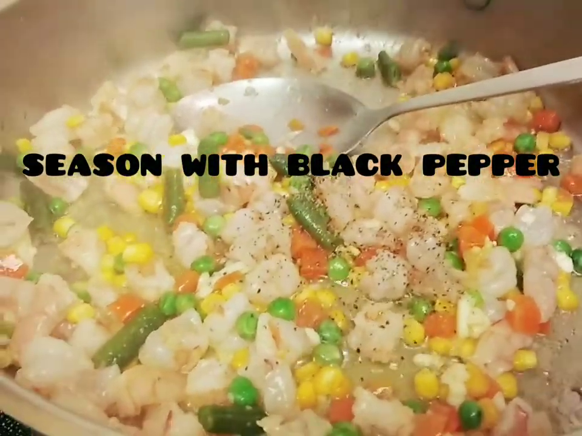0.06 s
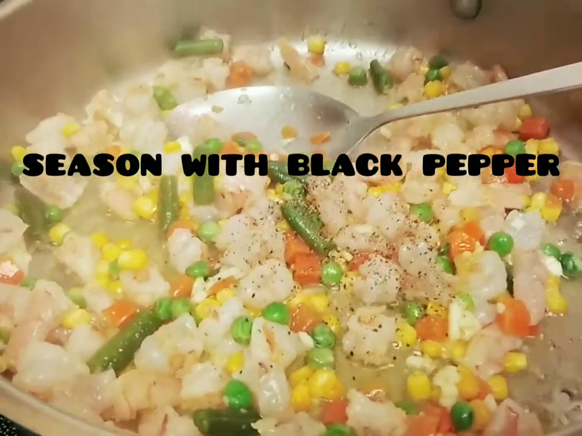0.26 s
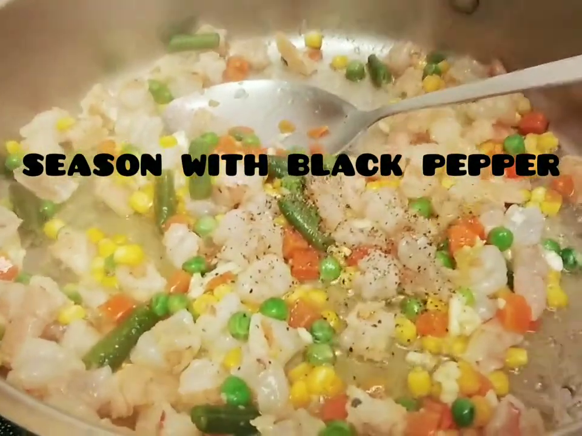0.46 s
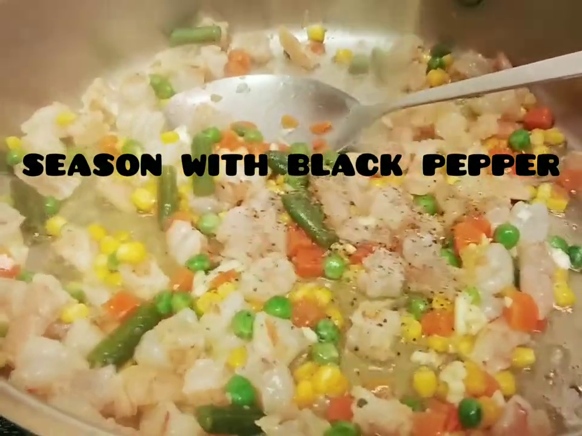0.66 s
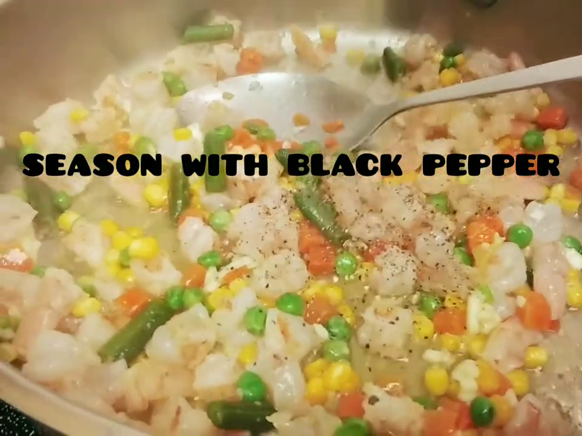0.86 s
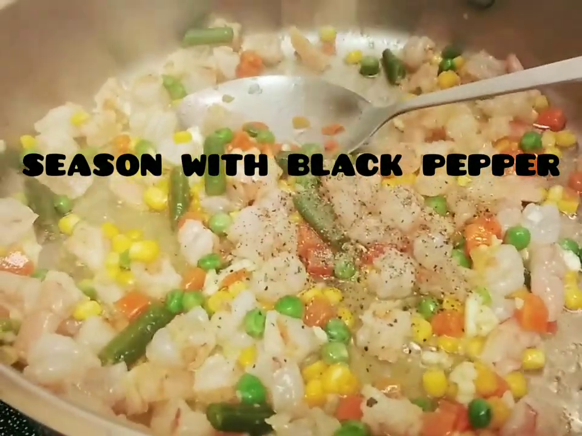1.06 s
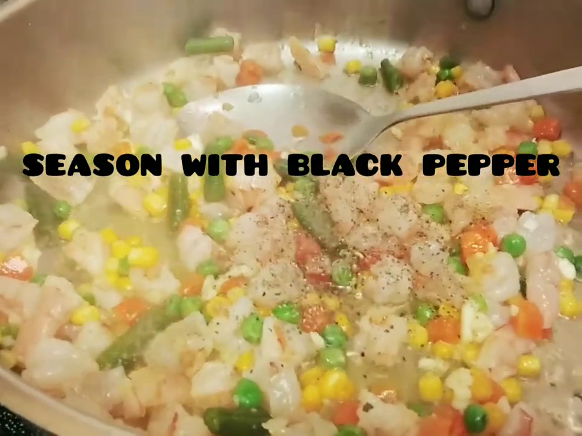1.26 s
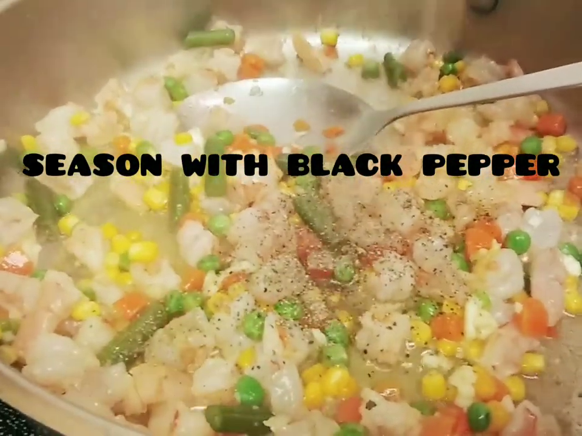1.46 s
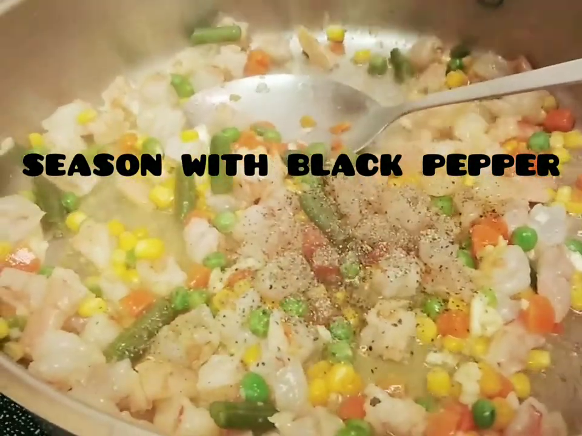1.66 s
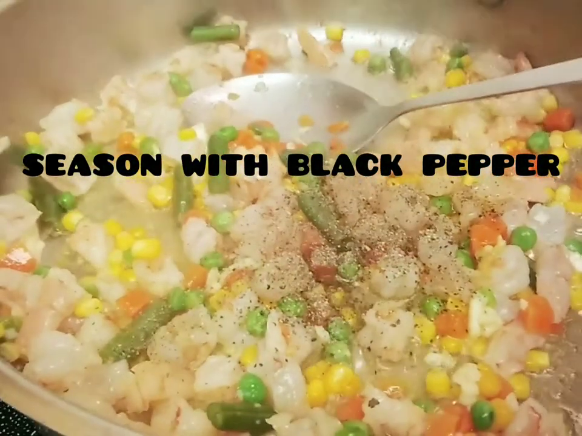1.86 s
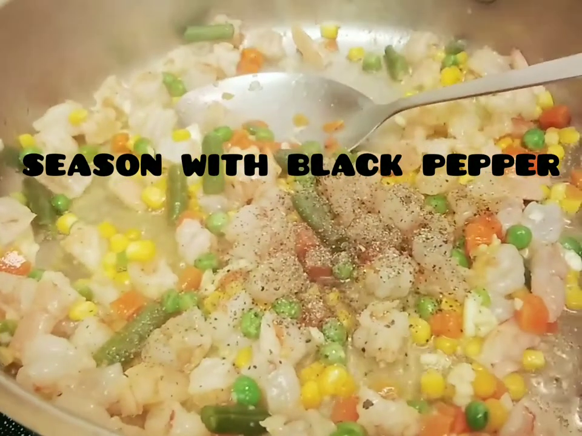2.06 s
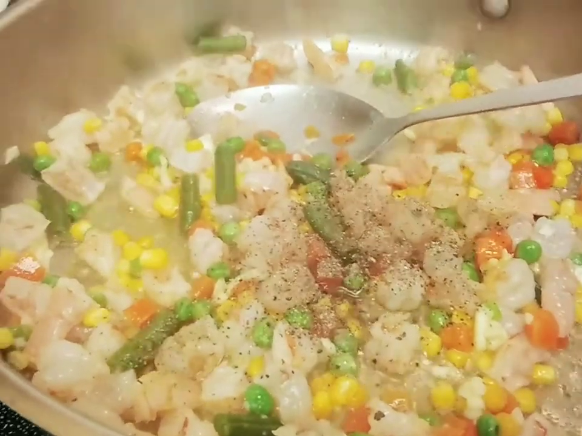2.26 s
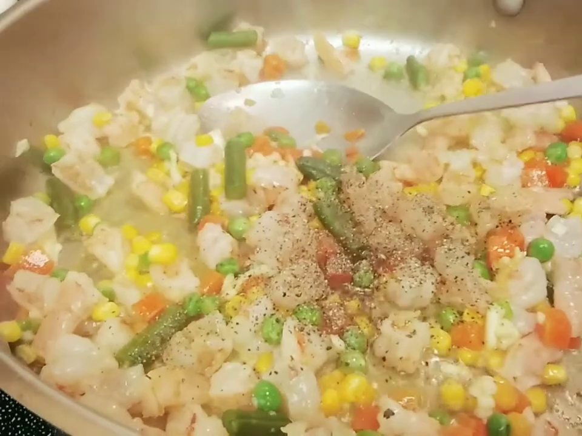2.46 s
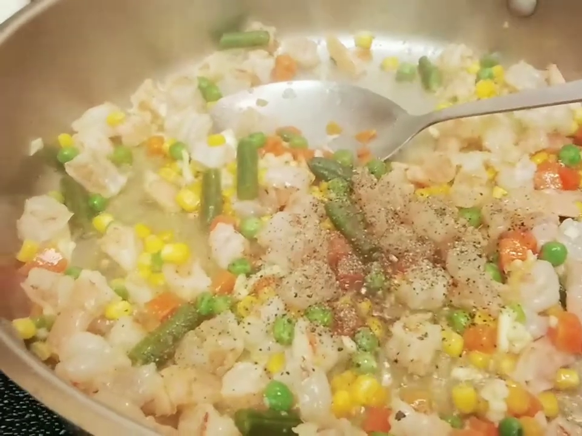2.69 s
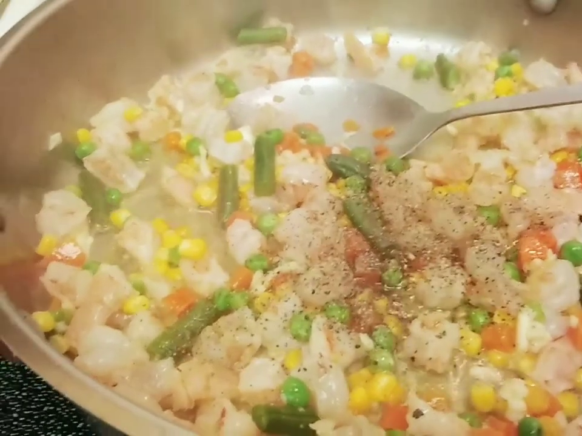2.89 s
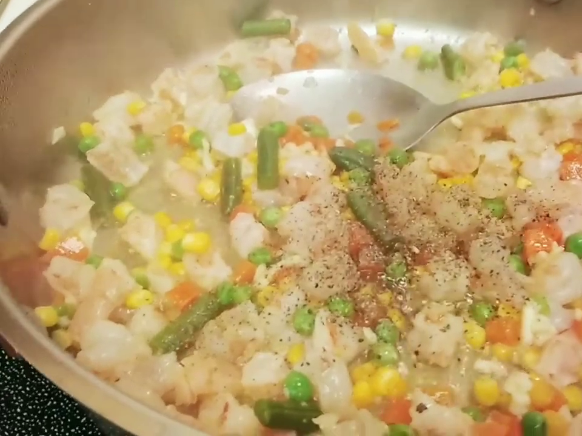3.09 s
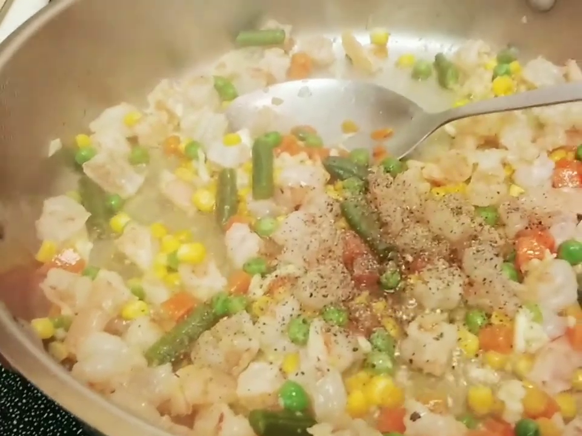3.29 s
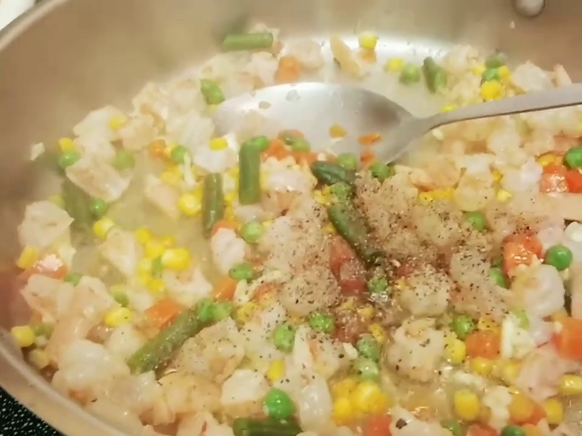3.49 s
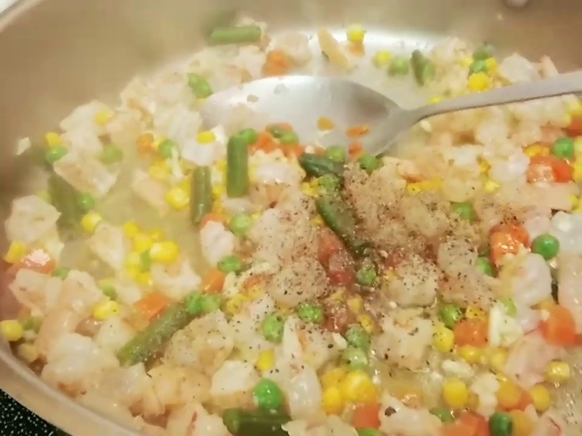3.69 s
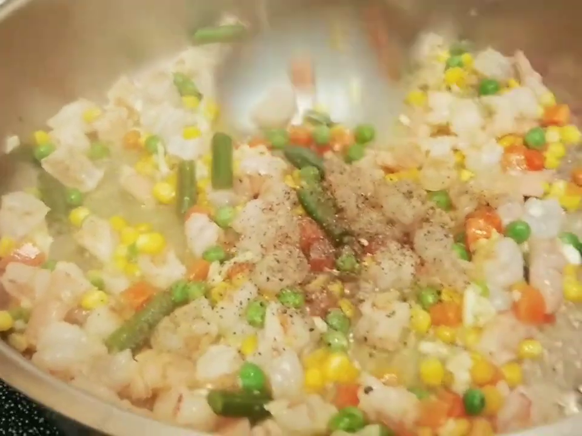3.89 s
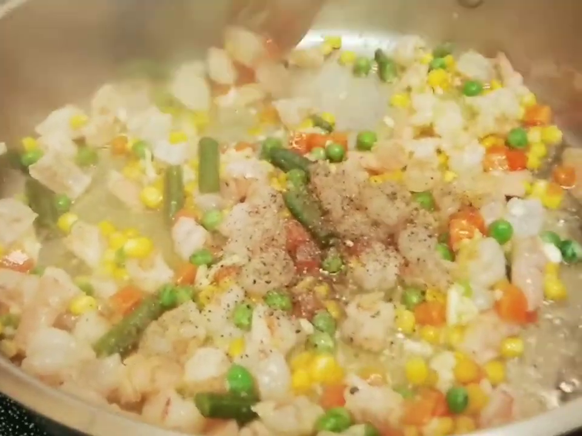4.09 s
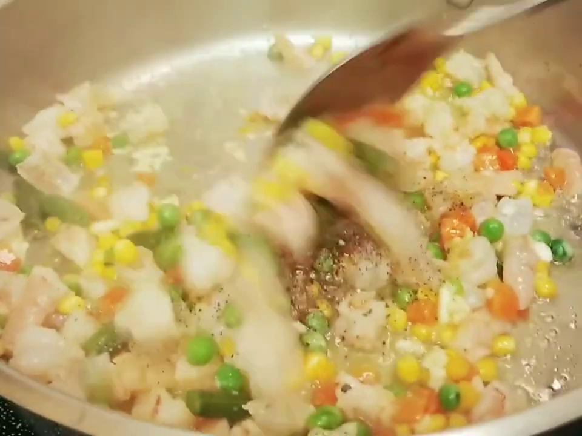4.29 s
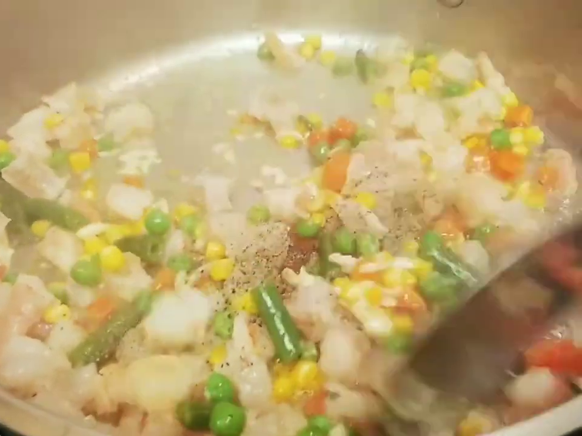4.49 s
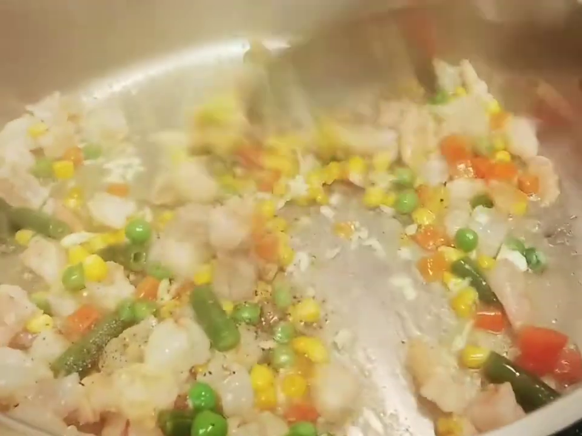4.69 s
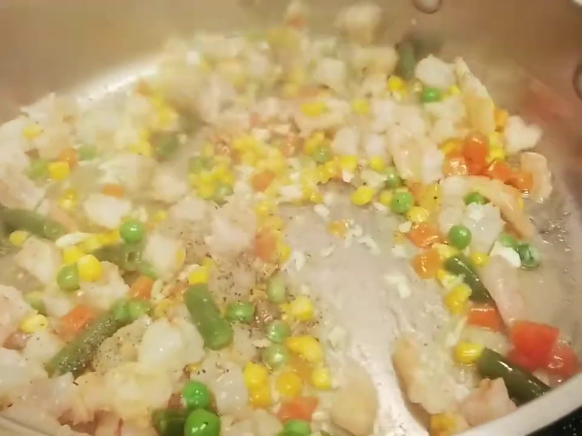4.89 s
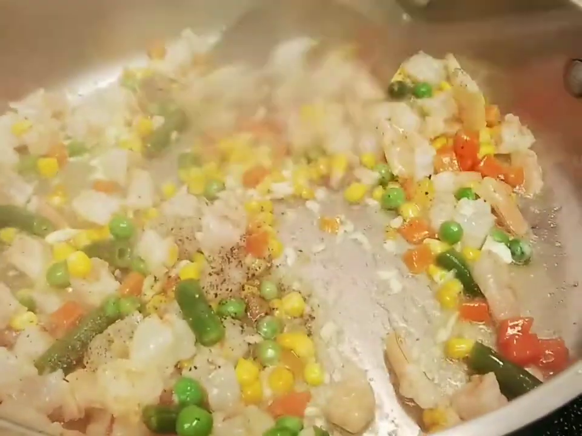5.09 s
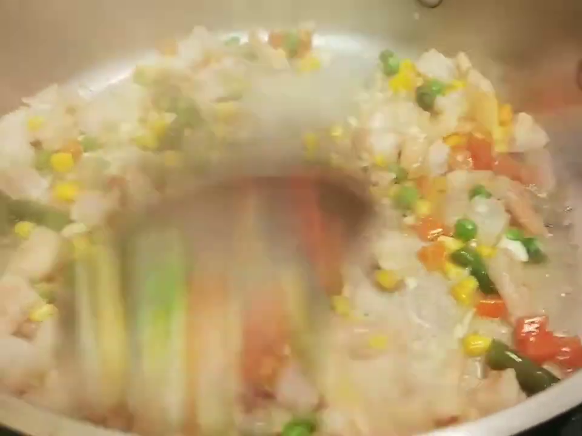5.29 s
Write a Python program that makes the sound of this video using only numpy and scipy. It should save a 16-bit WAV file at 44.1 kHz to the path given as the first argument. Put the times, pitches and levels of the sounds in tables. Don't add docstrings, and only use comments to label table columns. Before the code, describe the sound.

A steady, bright, fine-grained sizzle runs throughout, recorded close and nearly centred, with a little short room reflection on the knocks. Faint grainy rustling and light taps come first, then a woody thump as the shaker is put down. After a pause, spoon and pan knock together: one loud high clang, then two heavy ringing knocks with rasping scrapes, and finally food sliding and frying harder.

```python
import sys
import numpy as np
from scipy import signal
from scipy.io import wavfile
from scipy.ndimage import uniform_filter1d

SR = 44100
rng = np.random.default_rng(int(sys.argv[2]) if len(sys.argv) > 2 else 0)


def magnitude_from_level(level_db):
    exponent = np.asarray(level_db, float) / 20
    return 10 ** exponent


def store_wav(level_fs):
    pcm = np.round(np.clip(np.atleast_2d(level_fs), -1, 1) * 32767)
    wavfile.write(sys.argv[1], SR, pcm.T.astype(np.int16))


N = 235701


def rms_one(x):
    return x / np.sqrt(np.mean(x ** 2) + 1e-20)


def band(x, low_hz, high_hz, order=2):
    edges = np.clip([low_hz, high_hz], [10, 20], [.44 * SR, .45 * SR])
    return signal.sosfilt(signal.butter(order, edges, "band", fs=SR, output="sos"), x)


def drift(rate_hz):
    r = np.exp(-80 * np.pi * rate_hz / SR)
    settle = 2000
    noise = rng.standard_normal(N // 40 + 2 + settle)
    slow = signal.lfilter([1], [1, -2 * r, r * r], noise)[settle:]
    return np.interp(np.arange(N) / 40, np.arange(len(slow)), rms_one(slow - slow.mean()))


def grains(per_s, spread_db):
    sizes = magnitude_from_level(spread_db * np.minimum(rng.exponential(1, N), 5)) * rng.standard_normal(N)
    happens = rng.random(N) < per_s / SR
    return rms_one(sizes * happens + 1e-9)


def ring(x, hz, t60):
    r = magnitude_from_level(-60 / (t60 * SR))
    w = 2 * np.pi * hz / SR
    return signal.lfilter([0, np.sin(w)], [1, -2 * r * np.cos(w), r * r], x)


def add(out, s, sound, peak_db):
    at = round(s * SR)
    sound = magnitude_from_level(peak_db) * sound / np.max(np.abs(sound))
    out[at:at + len(sound)] += sound[:N - at]


def coloured(sources, spectrum, patchy_db):
    hz, db = np.transpose(spectrum)
    edges = hz[0] * 2 ** np.arange(0, np.log2(hz[-1] / hz[0]) + 1 / 3, 1 / 3)
    out, together = 0, drift(10.0)
    for k, (low, high) in enumerate(zip(edges, edges[1:])):
        level_db = np.interp(np.log(low * high) / 2, np.log(hz), db)
        flicker_db = patchy_db * (0.17 * together + drift(6.3))
        out = out + magnitude_from_level(level_db + flicker_db) * band(sources[k % 2], low, high)
    return rms_one(out)


def puffs(rows, octaves, order=2, rise_cycles=0.37, rise_share=0.0083):
    out, t = np.zeros(N), np.arange(SR // 2) / SR
    half_width = 2 ** (octaves / 2)
    for s, db, hz, t60 in rows:
        rise = np.minimum(t / (rise_cycles / hz + rise_share * t60), 1)
        puff = rng.standard_normal(len(t)) * magnitude_from_level(-60 * t / t60) * rise
        add(out, s, band(puff, hz / half_width, hz * half_width, order=order), db)
    return out


def struck(blows, modes, uneven_db, split, crack_db, crack_follows, rise_cycles):
    out, t = np.zeros(N), np.arange(SR // 3) / SR
    pairs = []
    for hz, db, t60 in modes:
        pairs += [(hz, db, t60), (hz * (1 + split), db - 8, t60)]
    for s, peak_db, contact_hz, chatter_t60, ring_share in blows:
        shape = magnitude_from_level(-60 * t / chatter_t60) * np.minimum(t * contact_hz / rise_cycles, 1)
        chatter = rng.standard_normal((len(pairs) + 1, len(t))) * shape
        strengths = magnitude_from_level(uneven_db * rng.standard_normal(len(pairs)))
        body = 0
        for (hz, db, t60), strength, push in zip(pairs, strengths, chatter):
            body = body + magnitude_from_level(db) * strength * ring(push, hz, ring_share * t60)
        crack = band(chatter[-1], .9 * modes[0][0], 1.1 * modes[-1][0])
        crack_level = magnitude_from_level(crack_db + crack_follows * peak_db)
        sound = body / np.max(np.abs(body)) + crack_level * crack / np.max(np.abs(crack))
        soft = signal.butter(3, min(contact_hz, .45 * SR), fs=SR, output="sos")
        add(out, s, signal.sosfilt(soft, sound), peak_db)
    return out


# frequency in Hz, density in dB per Hz.
AIR_SPECTRUM = [(15, -38), (25, -9), (54, 8.5), (123, -7), (144, -13), (237, 4.5), (267, 0.5), (335, 1),
                (372, 8), (900, -26), (1170, -40), (1980, -120)]


def kitchen_air():
    hum_db = -75.5 + 1.0 * drift(4.9)
    hum = magnitude_from_level(hum_db) * np.sin(2 * np.pi * 120 * np.arange(N) / SR)
    return magnitude_from_level(-68) * coloured(rng.standard_normal((2, N)), AIR_SPECTRUM, patchy_db=4.0) + hum


# time in seconds, top spray level in dB.
VIGOUR = [
    (0.0, -50),
    (2.13, -50),
    (2.5, -49),
    (3.61, -50.5),
    (3.94, -47.5),
    (4.27, -52.5),
    (4.43, -47.5),
    (5.07, -48.5),
    (5.34, -45),
]
# frequency in Hz, density in dB per Hz.
FIZZ_SPECTRUM = [(290, -51), (500, -13.5), (1000, -17), (1400, -10), (2000, -10.5), (2500, -8.5),
                 (4300, -7), (5500, -6.5), (6500, -3), (7900, 0.5), (9200, -2.5), (10500, -6), (12500, -13),
                 (15900, -10.5)]
# frequency in Hz, level in dB, t60 in seconds.
PAN_GLOW = [(456, -10, 0.18), (3730, 0, 0.032), (1150, 0, 0.059), (1620, -9, 0.04), (2310, -13, 0.14),
            (3250, -23, 0.17)]


def frying():
    vigour_db = np.interp(np.arange(N) / SR, *np.transpose(VIGOUR))
    swing_db = vigour_db - np.median(vigour_db)
    bubbles = [grains(9000, spread_db=-0.5), grains(9000, spread_db=1.5)]
    fizz = coloured(bubbles, FIZZ_SPECTRUM, patchy_db=1.4)
    glow = 0
    for hz, db, t60 in PAN_GLOW:
        glow = glow + magnitude_from_level(db - 43.0 + 2.17 * drift(4.8)) * ring(fizz, hz, t60)
    fizz = fizz + glow
    out = fizz
    for extra_share, edge_hz, side in [(0.096, 4700, "low"), (1, 10500, "high")]:
        part = signal.sosfilt(signal.butter(1, edge_hz, side, fs=SR, output="sos"), fizz)
        out = out + (magnitude_from_level(extra_share * swing_db) - 1) * part
    return magnitude_from_level(-43 + 0.46 * swing_db) * out


# start in seconds, peak in dB, centre in Hz, t60 in seconds.
SPITS = [
    (1.527, -33.5, 7900, .06),
    (1.741, -34, 2400, .1),
    (1.741, -29, 11100, 0.073),
    (1.741, -36, 5000, 0.055),
    (1.741, -48.5, 1140, 0.11),
    (2.663, -32.5, 8450, 0.061),
    (3.381, -26, 8700, 0.031),
    (3.856, -26, 7900, 0.03),
    (3.889, -28.5, 6200, 0.12),
    (4.612, -23.5, 12800, 0.039),
]


def oil_spits():
    return puffs(SPITS, octaves=0.6)


# start in seconds, peak in dB, centre in Hz, t60 in seconds.
BUMPS = [(.18, -57, 120, 0.28), (.62, -44, 222, .22), (.735, -49.5, 109, 0.26), (.875, -51.5, 69.6, 0.11),
         (.97, -49, 63.4, 0.066), (1.28, -49.5, 200, 0.48), (1.34, -55, 70, 0.051),
         (1.74, -43.5, 328, 0.083), (2.24, -49, 300, 0.18), (1.97, -65, 55, 0.13), (2.94, -48, 291, 0.09),
         (3.0, -58, 57.3, 0.8), (3.30, -53, 80, 0.1), (3.74, -53, 120, 0.51), (3.85, -42.5, 130, .5),
         (4.228, -39, 64, 0.56), (4.44, -47, 59.3, 0.26), (4.614, -20.5, 294, 0.065),
         (4.62, -31.5, 59.4, 0.69), (4.758, -33, 490, 0.043), (4.77, -28, 62, 0.27),
         (5.07, -44.5, 397, 0.26)]


def counter_bumps():
    return puffs(BUMPS, octaves=1.83, rise_cycles=.32, rise_share=0.01)


# start in seconds, peak in dB, centre in Hz, t60 in
# seconds.
RUSTLES = [
    (.405, -43, 1950, .23),
    (.44, -37.5, 5570, 0.23),
    (.612, -30.5, 5560, 0.24),
    (1.45, -35, 5660, .26),
    (2.233, -30.5, 645, 0.057),
]


def pepper_rustles():
    return puffs(RUSTLES, octaves=0.3)


# start in seconds, peak in dB, centre in Hz, t60
# in seconds.
WIDE_BURSTS = [
    (1.745, -43, 2700, .2),
    (2.236, -40, 860, 0.32),
    (4.684, -21.5, 2700, 0.11),
    (2.734, -25.5, 1480, 0.1),
    (2.74, -30, 2600, 0.065),
    (2.745, -30, 1000, 0.17),
    (2.915, -43.5, 1430, .12),
    (4.206, -30, 4380, .3),
    (4.245, -22, 4800, 0.24),
]


def wide_bursts():
    return puffs(WIDE_BURSTS, octaves=0.62)


# start in seconds, peak in dB, centre in Hz, t60 in seconds.
RATTLES = [
    (.79, -48.5, 617, .08),
    (1.178, -41, 5870, 0.097),
    (2.234, -44, 1550, 0.052),
    (2.26, -42.5, 2810, 0.44),
    (2.80, -44, 1520, 0.43),
    (2.813, -34.5, 1100, 0.068),
    (2.856, -45, 1150, 0.037),
    (3.19, -44, 2020, .07),
]


def shaker_rattles():
    return puffs(RATTLES, octaves=0.23)


# start in seconds, peak in dB, centre in Hz, t60 in seconds.
WOBBLES = [
    (2.83, -42, 235, 0.12),
    (2.88, -36, 250, .09),
    (3.945, -42.5, 616, 0.036),
    (4.771, -25.5, 440, 0.02),
    (5.25, -50, 447, 0.11),
]


def settling_wobbles():
    return puffs(WOBBLES, octaves=0.36)


# start in seconds, peak in dB, contact low-pass in Hz,
# chatter t60 in seconds, share of the free ring time.
SHAKER_DOWN = [
    (2.733, -9.5, 630, 0.073, 0.32),
    (2.850, -24.5, 317, 0.028, 0.57),
    (2.902, -20.5, 345, 0.021, 0.69),
    (2.919, -24.5, 460, 0.019, 0.31),
]
# frequency in Hz, level in dB, t60 in seconds.
COUNTER = [(55, -18, 0.14), (101, -25, 0.083), (200, -11.5, 0.13), (265, 7, 0.056), (479, -2, 0.13),
           (606, -2.5, 0.034), (743, -28, 0.15), (1000, -26, 0.092), (1130, 6, 0.12), (1480, -17, .15),
           (2046, 13.5, 0.16), (2700, -19, .08)]


def shaker_set_down():
    return struck(SHAKER_DOWN, COUNTER, uneven_db=2.5, split=0.069,
                  crack_db=8.5, crack_follows=1.17, rise_cycles=0.99)


# start in seconds, peak in dB, contact low-pass in Hz,
# chatter t60 in seconds, share of the free ring time.
PAN_KNOCKS = [
    (3.725, -21, 730, 0.021, 1),
    (3.778, -12, 1560, 0.02, 0.47),
    (3.980, -26, 1290, 0.018, 0.043),
    (4.227, -6, 2860, 0.037, 0.11),
    (4.613, -8.5, 1350, 0.053, 0.94),
    (4.683, -1, 3100, 0.029, 0.35),
]
# frequency in Hz, level in dB, t60 in seconds.
PAN = [(115.8, -13.5, 0.74), (294, -4, 0.12), (456, 3.5, 0.12), (563.4, -3, 0.16), (778, 3, 0.1),
       (916, -6, 0.11), (1149, -1, 0.15), (1275, -10.5, 0.073), (1400, 2, 0.037), (1520, 0, 0.082),
       (1530, -1, 0.17), (1948, -4, 0.33), (2270, -15, 0.03), (2305, -4.5, 0.033), (2335, 9, 0.095),
       (2804, 1, 0.11), (3240, -37, 0.15)]


def pan_knocks():
    return struck(PAN_KNOCKS, PAN, uneven_db=-1.0, split=0.042,
                  crack_db=-2.5, crack_follows=0.27, rise_cycles=2.84)


# start in seconds, peak in dB, contact low-pass in Hz,
# chatter t60 in seconds, share of the free ring time.
SPOON_CLANGS = [
    (3.726, -33.5, 6500, 0.13, 0.84),
    (3.779, -17.5, 4000, .015, 0.32),
    (4.227, 1, 15800, 0.069, 0.32),
    (4.240, -13, 11000, .04, .3),
    (4.616, -24.5, 8000, 0.03, 0.77),
]
# frequency in Hz, level in dB, t60 in seconds.
SPOON = [(3710, -2.5, 0.13), (3560, -1.5, 0.18), (3920, -2.5, 0.3), (4170, -1.5, 0.17), (4710, -1.5, 0.2),
         (5057, -1.5, 0.14), (5470, -5.5, 0.23), (6150, -16, 0.03), (7150, -23, 0.042), (7370, -26, 0.096),
         (7800, -21, 0.2), (8440, -9, 0.053), (8440, 12.5, 0.049), (8640, -12, 0.13), (9290, -11, 0.2),
         (9640, -4, 0.16), (10600, 3, 0.043), (11320, -1, 0.1), (14600, -12, 0.049), (16000, -2, 0.07)]


def spoon_clangs():
    return struck(SPOON_CLANGS, SPOON, uneven_db=0.5, split=0.015,
                  crack_db=2.0, crack_follows=0.37, rise_cycles=3.3)


def kitchen(x):
    t = np.arange(SR // 2) / SR
    echoes = rng.standard_normal(len(t)) * magnitude_from_level(-60 * t / 0.24) * (t > .004)
    echoes = band(echoes, 41, 9000, order=1)
    echoes = echoes / np.sqrt(np.sum(echoes ** 2))
    return x + magnitude_from_level(-15) * signal.fftconvolve(x, echoes)[:N]


# start in seconds, peak in dB, centre in Hz, t60 in seconds.
CHIRPS = [(3.778, -23, 7140, 0.042), (3.779, -33, 3730, 0.057), (3.80, -23, 7000, .08),
          (3.818, -37, 7100, 0.046), (3.86, -31, 3850, .06), (3.874, -23, 5560, 0.057),
          (3.981, -25.5, 3240, 0.024), (3.98, -29, 5170, 0.032), (4.28, -24, 5530, 0.27),
          (4.3, -35.5, 1086, 0.21), (4.613, -19.5, 7200, .084), (4.64, -23, 2450, 0.11),
          (4.645, -20, 7150, 0.22)]


def spoon_chirps():
    return puffs(CHIRPS, octaves=0.2, order=3)


def rubbing(bands, per_s, ringing):
    slips = [grains(per_s, spread_db=0.5) * magnitude_from_level(1.7 * drift(70.0)) for _ in bands]
    steel = 0
    for k, (hz, db, t60) in enumerate(PAN + SPOON):
        steel = steel + magnitude_from_level(db / 3) * ring(slips[k % 4], hz, .6 * t60)
    rasps = []
    for slip, (low_hz, high_hz) in zip(slips, bands):
        plain = rms_one(band(slip, low_hz, high_hz, order=4))
        rung = rms_one(band(steel, low_hz, high_hz, order=4))
        rasps.append(rms_one(plain + ringing * rung))
    return rasps


def strokes(rows, lower, upper, rise_db_per_s):
    out, t = np.zeros(N), np.arange(N) / SR
    for s, db, hold, t60, upper_db in rows:
        swell_db = rise_db_per_s * (t - s)
        decay_db = -60 * (t - s - hold) / t60
        shape_db = np.clip(np.minimum(swell_db, decay_db), -200, 0)
        out += magnitude_from_level(db + shape_db) * (lower + magnitude_from_level(upper_db) * upper)
    return out


# low edge in Hz, high edge in Hz.
SCRAPE_BANDS = [(90, 860), (900, 3720), (5850, 7360), (7700, 16300)]
# start
# in seconds, rms in dB, hold in seconds, t60 in seconds, upper band against lower in dB.
DRAGS = [
    (3.728, -40, 0.0079, 0.19, -1.5),
    (3.788, -39.5, 0.0025, 0.14, 5),
    (3.848, -46.5, 0.015, 0.68, 1.5),
    (3.988, -54.5, 0.0024, 0.1, 16.5),
    (4.211, -47, 0.0046, .2, 1.5),
    (4.222, -29.5, 0.019, 0.21, 4),
    (4.625, -25.5, 0.0085, 0.21, -4.5),
    (4.696, -28.5, .003, 0.29, -1.5),
    (4.81, -50, .01, 0.11, -4),
]
# start in seconds, rms in dB,
# hold in seconds, t60 in seconds, upper band against lower in dB.
SQUEALS = [
    (3.728, -33.5, .003, 0.34, -10),
    (3.79, -34.5, 0.052, 0.23, -11),
    (3.875, -56, .003, 0.18, -10),
    (3.99, -41.5, 0.029, 0.18, -17),
    (4.212, -38, 0.014, .2, 5),
    (4.232, -27, 0.046, 0.24, -3),
    (4.618, -33.5, 0.085, .09, -12),
]


def scraping():
    rumble, bowl, squeal, hiss = rubbing(SCRAPE_BANDS, per_s=3500, ringing=0.76)
    drags = strokes(DRAGS, rumble, bowl, rise_db_per_s=1493)
    return drags + strokes(SQUEALS, squeal, hiss, rise_db_per_s=1493)


# low edge in Hz, high edge in Hz.
TURN_BANDS = [(900, 4000), (4600, 6200), (5800, 7100), (7500, 9350)]
# start in seconds, rms in dB,
# hold in seconds, t60 in seconds, upper band against lower in dB.
SLIDES = [
    (5.03, -45.5, 0.034, 0.27, 2.5),
    (5.09, -51, 0.055, 0.55, -12),
]
# start in seconds, rms in dB,
# hold in seconds, t60 in seconds, upper band against lower in dB.
FLARES = [
    (5.204, -39, .003, 0.21, -9),
    (5.215, -53, .03, .3, 13.5),
    (5.258, -54.5, 0.023, .15, 17.5),
]


def turning_food():
    slide, rustle, flare, bright = rubbing(TURN_BANDS, per_s=4400, ringing=0.79)
    slides = strokes(SLIDES, slide, rustle, rise_db_per_s=450)
    return slides + strokes(FLARES, flare, bright, rise_db_per_s=900)


# start in seconds, length in seconds, lower edge in Hz,
# level under the sound in dB.
SPLITS = [
    (1.71, 0.069, 200, -9.5),
    (3.37, .025, 5500, -14),
    (4.196, 0.035, 4560, -4),
]


def split_channels(mid):
    side, t = np.zeros(N), np.arange(N) / SR
    loudness = np.sqrt(uniform_filter1d(mid ** 2, size=200) + 1e-12)
    grain = rng.standard_normal(N) * loudness
    for s, length, low_hz, db in SPLITS:
        fade = np.clip(np.minimum(t - s, s + length - t) / .008, 0, 1)
        side += magnitude_from_level(db) * fade * band(grain, low_hz, 15500, order=4)
    return np.array([mid + side, mid - side])


def scene():
    mid = kitchen_air() + frying() + oil_spits() + counter_bumps()
    mid += pepper_rustles() + wide_bursts() + shaker_rattles() + settling_wobbles()
    mid += kitchen(shaker_set_down() + pan_knocks() + spoon_clangs())
    mid += spoon_chirps() + scraping() + turning_food()
    return split_channels(mid)


def roll_off(x):
    return signal.sosfilt(signal.butter(12, 15840, fs=SR, output="sos"), x)


def record(dry):
    dry = signal.sosfilt(signal.butter(4, 50, "high", fs=SR, output="sos"), dry)
    dry = .88 * np.tanh(dry / .88)
    mix = signal.sosfilt(signal.ellip(10, .5, 90, 15800, fs=SR, output="sos"), dry)
    return roll_off(mix)


dry = scene()
out = record(dry)
store_wav(out)
```